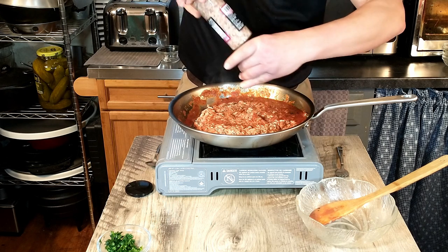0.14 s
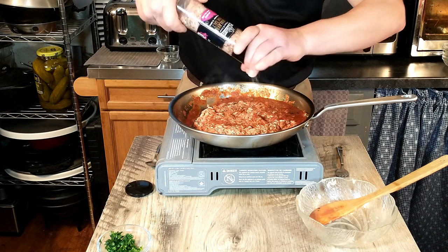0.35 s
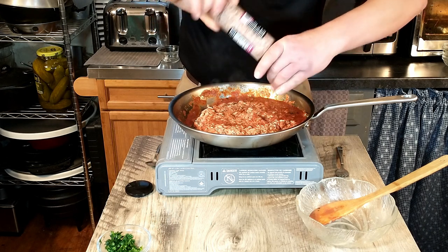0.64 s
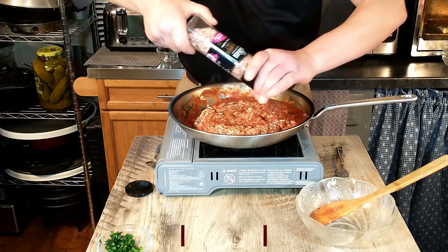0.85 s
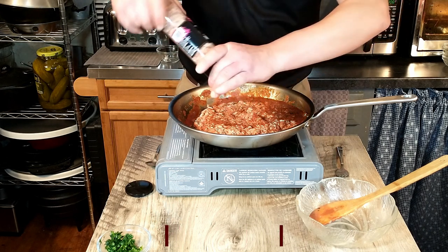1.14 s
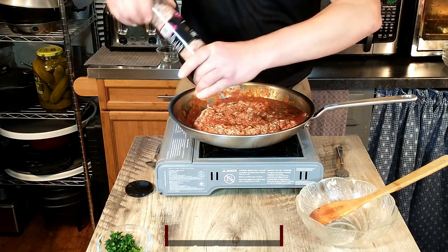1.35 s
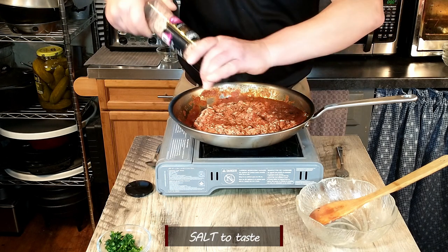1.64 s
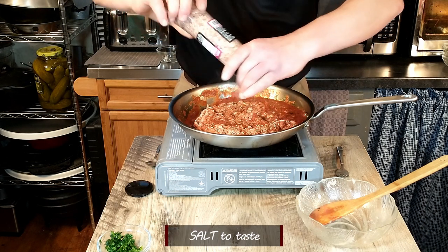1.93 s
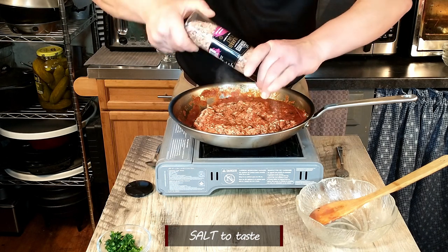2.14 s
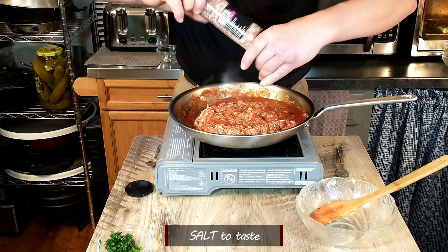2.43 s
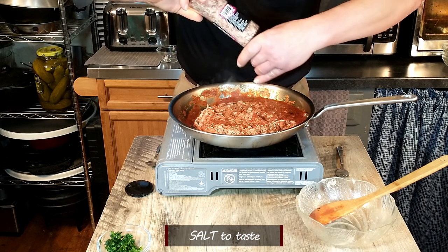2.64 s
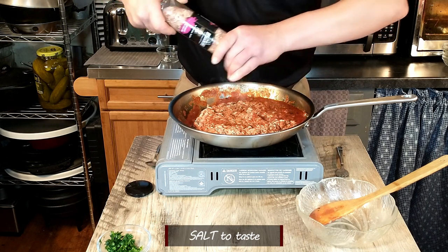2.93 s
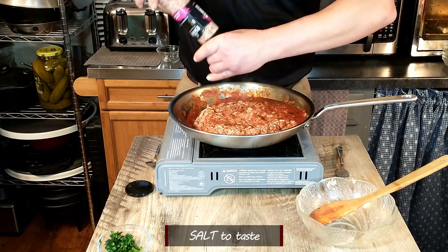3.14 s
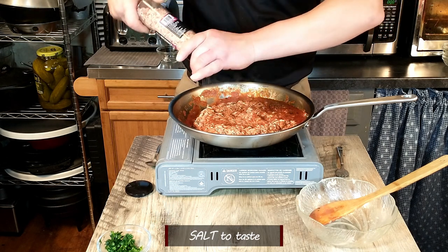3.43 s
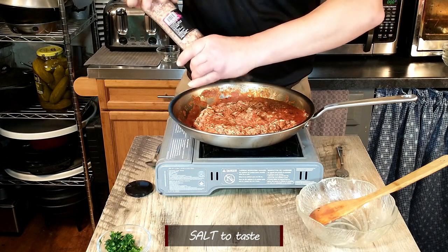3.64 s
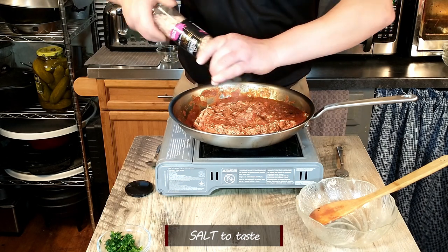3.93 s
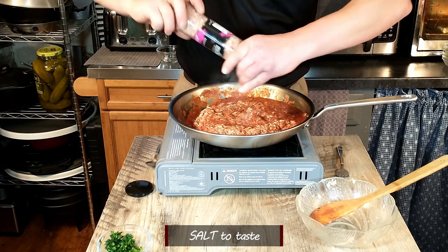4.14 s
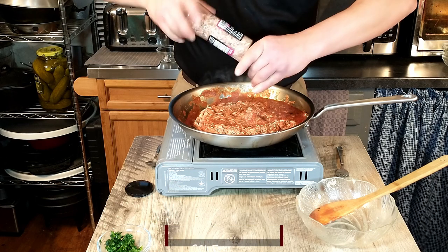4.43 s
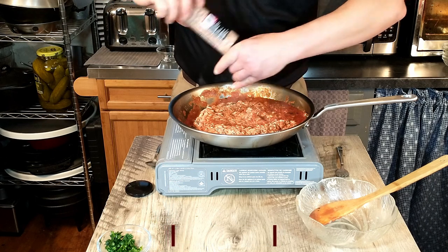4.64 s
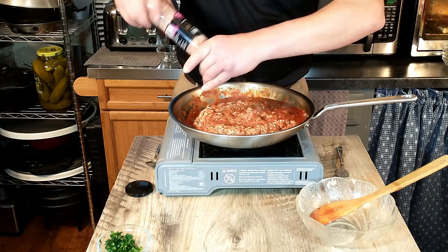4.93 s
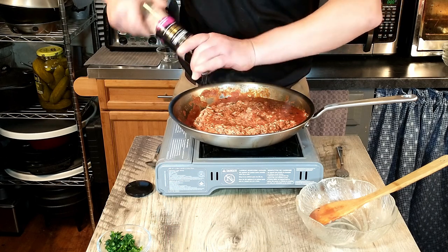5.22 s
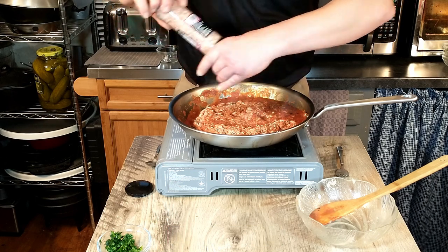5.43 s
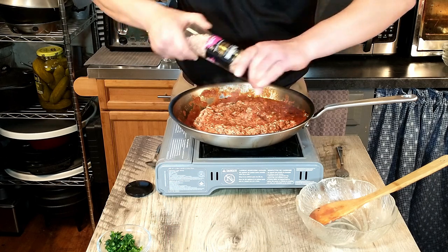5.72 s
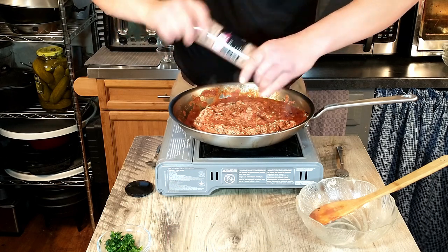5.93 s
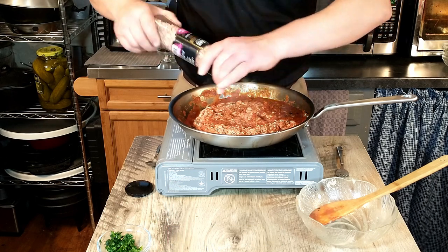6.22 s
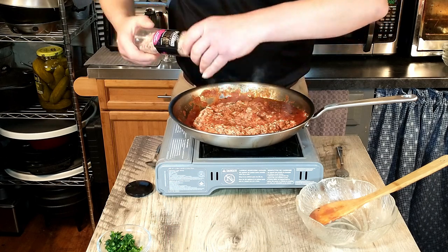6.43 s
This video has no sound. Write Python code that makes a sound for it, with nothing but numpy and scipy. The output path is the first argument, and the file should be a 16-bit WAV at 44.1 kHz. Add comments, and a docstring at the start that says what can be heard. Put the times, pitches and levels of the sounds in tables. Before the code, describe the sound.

A salt grinder is twisted by hand in a small kitchen, about two turns a second. Each forward twist cracks a few big crystals and crunches the chips, and a lighter rasp follows as the wrist swings back. Loose salt rattles brightly in the jar and the plastic cap creaks faintly now and then. Thick sauce simmers very softly underneath. The microphone sounds slightly dull.

```python
"""A small kitchen: a salt grinder is twisted by hand, about two turns a second, over a simmering pan.
Each forward twist cracks a few big crystals and crushes the chips, ringing the plastic housing.
The return twist is lighter. Loose salt rattles in the jar, and the cap creaks now and then.
The microphone is dull above 8 kHz and clips on the hardest cracks."""
import sys
import numpy as np
from scipy import signal
from scipy.fft import rfft, irfft
from scipy.io import wavfile
from scipy.ndimage import uniform_filter1d

SR = 44100
rng = np.random.default_rng(int(sys.argv[2]) if len(sys.argv) > 2 else 0)


def put_to_file(sound):
    """Save the sound as 16-bit audio at rate SR, in the file named by the first command-line argument."""
    columns = np.atleast_2d(sound).T  # one column per channel
    safe = np.clip(columns, -1, 1)
    whole_steps = np.round(safe * 32767)
    wavfile.write(sys.argv[1], SR, whole_steps.astype(np.int16))


N = 290574

# Spectra of sauce, loose salt, milled chips and big snaps. Each row: frequency in Hz, level in dB.
SIMMER_SPECTRUM = [(20, -10.5), (55, -19.5), (100, -8.5), (180, 0.5), (350, 1), (490, 7), (590, 11.5),
                   (720, 5), (900, 3), (1300, 3), (2200, -4), (7000, -8)]
RATTLE_SPECTRUM = [(100, -39.5), (400, -35.5), (1200, -13.5), (2500, -14.5), (3600, -4), (4600, -1),
                   (5600, 3), (7000, 4.5), (8000, -3)]
CRUNCH_SPECTRUM = [(40, -39.5), (120, -43), (280, -13.5), (550, -6.5), (900, -4.2), (1300, 1.3),
                   (2000, 2.5), (2900, -1.1), (4500, -1.2), (6300, -8.5), (8000, -16)]
SNAP_SPECTRUM = [(40, -46.5), (120, -35), (280, -16), (550, -9.5), (900, -5), (1400, 5.5), (2100, 4.8),
                 (3000, 5), (4500, 3.5), (6300, 0.5), (8000, -6)]
# Housing modes, and shell notes woken by hard jolts. Each row: frequency in Hz, level in dB, T60 in seconds.
HOUSING_MODES = [(184, -28, 0.12), (290, -21, 0.12), (730, -20, 0.07), (1038, -15, 0.022),
                 (1200, -12.5, .025), (1560, -26, 0.012), (1750, -20.5, 0.015), (2500, -21, 0.04),
                 (4530, -25, 0.017), (6200, -3.5, 0.021)]
SHELL_MODES = [(1165, -2, 0.0714), (1235.7, 0, .1), (1300, -.5, .1), (1425, 1, .09), (1551, 1.5, .09),
               (1690, -2, .09), (1870, -1, .08), (2030, 1, .08)]
# Cap rubbing its seat on release. Each row: start and length in seconds, pitch in Hz, level in dB.
CAP_RUBS = [(3.931, 0.08, 1690, -37.5), (4.032, 0.087, 1677, -47.5), (4.368, 0.067, 1750, -44),
            (4.901, 0.063, 1718, -39), (5.756, 0.075, 1667, -38), (6.154, 0.09, 1750, -35.5)]
# Salt stirring as the grinder is waved about. Each row: time in seconds, level in dB.
SALT_STIRRING = [(0, -40), (1.35, -31), (2.3, -36), (2.68, -45), (2.8, -38), (3.17, -48), (3.3, -36),
                 (3.64, -56), (3.75, -30), (4.05, -43), (4.9, -32), (5.4, -33), (6.36, -30), (6.5, -44)]
# Forward twists. Each row: start in seconds; crush length in seconds, level in dB, 20 dB fade in seconds;
# salt length in seconds, level in dB, swell in seconds, 20 dB fade in seconds.
FORWARD_TWISTS = [(0.297, 0.089, -16.4, 0.146, 0.12, -15.9, 0.043, 0.134),
                  (0.746, 0.079, -15.0, 0.076, 0.121, -15.5, 0.004, 0.042),
                  (1.174, 0.09, -17.1, 0.138, 0.095, -15.8, 0.004, 0.063),
                  (1.632, 0.097, -18.3, 0.08, 0.139, -14.6, 0.036, 0.04),
                  (2.075, 0.083, -18.7, 0.087, 0.138, -17.1, 0.029, 0.088),
                  (2.857, 0.085, -16.8, 0.168, 0.173, -18.8, 0.004, 0.065),
                  (3.332, 0.107, -15.3, 0.088, 0.131, -16.2, 0.026, 0.066),
                  (3.8, 0.081, -16.1, 0.144, 0.119, -15.5, 0.062, 0.04),
                  (4.252, 0.083, -16.8, 0.145, 0.113, -15.2, 0.004, 0.086),
                  (4.74, 0.095, -14.5, 0.152, 0.136, -18.4, 0.019, 0.116),
                  (5.194, 0.085, -16.6, 0.149, 0.145, -17.8, 0.044, 0.12),
                  (5.609, 0.086, -14.6, 0.165, 0.163, -15.6, 0.104, 0.04),
                  (6.014, 0.087, -17.3, 0.173, 0.14, -15.0, 0.124, 0.04)]
# Lighter twists as the wrist swings back. Each row: as for the forward twists.
RETURN_TWISTS = [(0.0, 0.009, -20.6, 0.06, 0.008, -15.4, 0.055, 0.05),
                 (0.085, 0.113, -21.1, 0.067, 0.211, -26.6, 0.046, 0.105),
                 (0.542, 0.062, -21.8, 0.072, 0.093, -21.2, 0.057, 0.13),
                 (0.971, 0.083, -24.5, 0.086, 0.2, -26.9, 0.032, 0.1),
                 (1.429, 0.067, -24.0, 0.133, 0.202, -28.0, 0.089, 0.099),
                 (1.858, 0.099, -25.0, 0.077, 0.175, -24.7, 0.011, 0.106),
                 (2.298, 0.029, -22.0, 0.056, 0.019, -27.1, 0.016, 0.08),
                 (2.398, 0.018, -19.7, 0.043, 0.014, -22.6, 0.004, 0.071),
                 (2.521, 0.011, -21.8, 0.125, 0.023, -24.8, 0.02, 0.096),
                 (2.799, 0.033, -21.2, 0.077, 0.064, -26.8, 0.004, 0.097),
                 (3.242, 0.036, -29.0, 0.061, 0.042, -17.2, 0.032, 0.081),
                 (3.743, 0.055, -35.0, 0.1, 0.021, -25.9, 0.004, 0.06),
                 (4.075, 0.033, -39.0, 0.102, 0.039, -27.3, 0.017, 0.104),
                 (4.129, 0.084, -38.2, 0.091, 0.084, -17.4, 0.015, 0.04),
                 (4.475, 0.026, -28.4, 0.078, 0.028, -35.0, 0.025, 0.093),
                 (4.564, 0.092, -31.7, 0.101, 0.081, -19.9, 0.008, 0.078),
                 (4.986, 0.086, -21.0, 0.095, 0.097, -24.3, 0.057, 0.136),
                 (5.403, 0.095, -21.2, 0.087, 0.135, -23.8, 0.046, 0.062),
                 (5.83, 0.082, -21.7, 0.06, 0.128, -26.5, 0.02, 0.098),
                 (6.239, 0.027, -20.9, 0.156, 0.054, -26.5, 0.027, 0.117),
                 (6.536, 0.05, -34.6, 0.1, 0.05, -25.8, 0.039, 0.1)]
# Big crystals cracking, cap knocking. Each row: start in seconds, force in dB, treble in dB, bass in dB,
# jolt pitch in Hz, shell ring in dB.
BIG_CRACKS = [(0.0976, -6.0, -2.0, 12.0, 1210.0, 0.0), (0.2901, -3.0, 2.0, -1.0, 1710.0, 0.0),
              (0.301, 3.0, -4.0, -6.5, 1410.0, 2.0), (0.3446, 8.0, -3.0, 1.0, 1435.0, 3.0),
              (0.3537, 3.5, -10.5, -5.5, 1425.0, 5.0), (0.751, 6.0, -5.0, 3.5, 1250.0, 2.0),
              (0.7596, 4.0, 7.5, 0.5, 1240.0, 0.0), (0.7735, 4.0, 0.5, 1.5, 1250.0, -3.0),
              (0.813, 11.0, 2.5, -3.5, 1540.0, -3.0), (0.9727, -9.0, -2.0, -0.5, 1470.0, 0.0),
              (1.011, -2.0, -2.5, 9.0, 2060.0, 0.0), (1.1761, -1.5, -12.5, 10.0, 1330.0, 0.0),
              (1.19, 5.0, -9.5, -2.5, 1400.0, -5.0), (1.2423, 9.5, 4.0, 0.5, 2050.0, 0.0),
              (1.246, 5.5, -2.0, 3.0, 1550.0, 0.0), (1.4425, -2.0, -1.5, 6.0, 1420.0, -8.0),
              (1.4944, -1.0, -8.5, 2.0, 1870.0, 0.0), (1.6359, -0.5, -0.5, 2.5, 1680.0, 0.0),
              (1.6669, 8.5, -1.5, -11.5, 1150.0, -8.0), (1.7187, 3.0, -1.5, -6.0, 1220.0, 0.0),
              (1.8612, -9.0, -2.0, 1.0, 1270.0, 0.0), (2.0863, -0.5, -2.5, -3.0, 1260.0, 4.0),
              (2.115, 6.0, 1.5, 5.0, 1950.0, -8.0), (2.1523, 6.5, -1.0, 7.0, 1620.0, 0.0),
              (2.1825, 6.0, 18.5, -2.0, 1920.0, 0.0), (2.3082, -11.5, 1.5, -0.5, 1660.0, 0.0),
              (2.4016, 6.0, -4.0, 7.0, 1290.0, 3.0), (2.4848, -8.0, 14.0, 0.5, 1280.0, 0.0),
              (2.5279, 7.0, 2.0, -5.5, 1660.0, -3.0), (2.5389, 3.0, -5.0, -3.5, 1660.0, 0.0),
              (2.8624, 6.5, -9.0, 0.0, 1180.0, 2.0), (2.8774, 3.5, -1.0, -4.5, 1220.0, 0.0),
              (2.9204, 2.0, -5.0, -4.5, 1540.0, 6.0), (2.9797, -1.0, 1.0, -1.0, 1230.0, 0.0),
              (3.1094, -7.5, -0.0, -1.0, 1220.0, 0.0), (3.22, -9.0, 15.5, -0.5, 1210.0, 0.0),
              (3.3392, 0.5, -2.0, 3.5, 1900.0, 0.0), (3.383, 2.0, -10.0, 8.0, 1510.0, 0.0),
              (3.831, 1.5, -6.5, -3.5, 1440.0, 0.0), (3.8833, 3.0, 16.0, -2.5, 1900.0, 0.0),
              (4.136, -5.5, 9.5, -3.5, 1720.0, 0.0), (4.2589, 3.5, -8.0, -5.0, 1990.0, 4.0),
              (4.2826, 4.5, -13.5, -9.0, 1540.0, 0.0), (4.3286, 7.0, -0.0, -4.0, 1950.0, 3.0),
              (4.5618, -9.5, 13.5, -0.5, 1150.0, 0.0), (4.6572, -0.5, -10.0, 15.0, 1240.0, 5.0),
              (4.7466, -4.0, -9.5, 13.0, 1590.0, 0.0), (4.7932, 5.5, -1.5, 0.0, 2020.0, 0.0),
              (4.8412, 4.5, 4.5, -1.5, 2060.0, 0.0), (4.8615, 3.5, 11.0, -0.5, 1220.0, 0.0),
              (4.9969, -0.5, -14.5, 7.5, 1660.0, 4.0), (5.1984, -4.5, -8.0, 6.0, 1140.0, 8.0),
              (5.2443, 3.5, -1.5, -5.0, 1220.0, 5.0), (5.2968, 1.5, 5.5, -3.5, 1980.0, -4.0),
              (5.442, 1.0, -14.0, 15.0, 1220.0, 2.0), (5.6149, 0.0, -4.0, 6.5, 1295.0, 10.0),
              (5.672, 3.5, 7.0, 1.5, 1240.0, 8.0), (5.8722, 1.0, 12.0, 16.0, 1330.0, 0.0),
              (5.933, -4.5, 5.0, -1.5, 1960.0, 0.0), (6.0047, -2.0, -4.0, 8.5, 1940.0, 0.0),
              (6.0197, 3.0, -10.5, 15.0, 1670.0, -3.0), (6.107, -0.5, 0.0, 3.0, 1650.0, -4.0),
              (6.2433, -6.0, -0.5, 15.0, 1450.0, 0.0), (6.2936, -4.5, -2.5, 14.0, 1290.0, -8.0)]
# Room decay. Each row: frequency in Hz, T60 in seconds.
ROOM_DECAY = [(200, 0.138), (1400, 0.236), (4000, 0.2097), (7500, 0.2357)]


def gain_of(db):
    """Decibels to amplitude."""
    return 10 ** (np.asarray(db) / 20)


def unit_rms(x):
    """Scales to RMS 1."""
    return x / np.sqrt(np.mean(x ** 2) + 1e-20)


def curve_at(points, hz):
    """Interpolates a table over log frequency."""
    point_hz, value = np.transpose(points)
    return np.interp(np.log(hz + 1), np.log(point_hz), value)


def add(mix, start_s, sound):
    """Mixes a sound in at start_s."""
    part = mix[max(round(start_s * SR), 0):][:len(sound)]
    part += sound[:len(part)]


def mic_lowpass(x, edge_hz=7900):
    """The microphone's steep treble limit."""
    return signal.oaconvolve(x, signal.firwin(121, edge_hz, window=("kaiser", 8), fs=SR), "same")


def cut_rumble(x, corner_hz):
    """High-pass that takes low rumble out of the grinder and its echoes."""
    return signal.sosfilt(signal.butter(3, corner_hz, "highpass", fs=SR, output="sos"), x)


def causal_click(spectrum_db):
    """Minimum-phase click with the given spectrum."""
    log_gain = np.log(gain_of(np.concatenate([spectrum_db, spectrum_db[-2:0:-1]])))
    return np.fft.ifft(np.exp(np.conj(signal.hilbert(log_gain)))).real


def grain(spectrum, ragged_db, smear_s, treble_db=0, bass_db=0, size=2048):
    """One click, coloured by the grain's chance shape; each frequency leaves by its own path."""
    hz = np.fft.rfftfreq(size, 1 / SR)
    noise = rng.standard_normal((2, len(hz)))
    shape, path = unit_rms(uniform_filter1d(uniform_filter1d(noise, 50), 30))
    tilt_db = curve_at([(70, 0), (260, bass_db), (520, bass_db), (1100, 0),
                        (2200, 0.0042), (5000, treble_db)], hz)
    click = causal_click(curve_at(spectrum, hz) + ragged_db * shape + tilt_db)
    delay_s = smear_s * (1 + np.tanh(path)) / 2
    click = irfft(rfft(click) * np.exp(-2j * np.pi * np.cumsum(delay_s) * hz[1]))
    return click / np.linalg.norm(mic_lowpass(click))


def grain_stream(spectrum, per_s, spread_db, ragged_db, steady_s, smear_s=0.0007075, kinds=32):
    """Randomly timed clicks of even mean power."""
    hits = gain_of(spread_db * np.minimum(rng.exponential(1, N), 4))
    hits *= rng.random(N) < per_s / SR
    window = int(steady_s * SR)
    power = uniform_filter1d(uniform_filter1d(hits ** 2, window), window)
    hits *= rng.choice([-1, 1], N) / np.sqrt(abs(power) + 1e-6)
    kind = rng.integers(0, kinds, N)
    return sum(signal.oaconvolve(hits * (kind == k), grain(spectrum, ragged_db, smear_s))[:N]
               for k in range(kinds))


def stove(mains_hz=60):
    """Thick sauce simmers softly over a faint mains hum."""
    hum = np.sqrt(2) * np.sin(2 * np.pi * mains_hz * np.arange(N) / SR)
    simmer = grain_stream(SIMMER_SPECTRUM, per_s=700, spread_db=0, ragged_db=2, steady_s=0.18, kinds=24)
    return gain_of(-64.5) * hum + gain_of(-41) * simmer


def room_response(wet_db, early_db, echoes_per_s=4000, size=16000):
    """Echoes from pan, counter and cupboards, then a short tail that dies band by band."""
    onset = np.clip((np.arange(size) / SR - .002) / 0.00227, 0, 1)
    taps = rng.choice([-1, 1], size) * (rng.random(size) < echoes_per_s / SR) * onset
    hz, frame_s, bands = signal.stft(taps, SR, nperseg=256)
    decay = gain_of(-60 * frame_s / curve_at(ROOM_DECAY, hz)[:, None])
    tail = signal.istft(bands * decay, SR, nperseg=256)[1][:size]
    response = gain_of(wet_db) * tail / np.linalg.norm(tail)
    for echo_s in (.0057, .0083, .0165):
        add(response, echo_s * rng.uniform(0.81, 1.1), gain_of([early_db]))
    return response


def kitchen(x, wet_db, early_db, patterns=7, crossfade_s=.007):
    """Fractures round the burr radiate different ways, so successive ones raise different echoes."""
    position = np.arange(N) / SR / crossfade_s
    out = x.copy()
    for k in range(patterns):
        distance = np.minimum(abs((position - k + 1) % patterns - 1), 1)
        out += signal.oaconvolve(x * np.cos(np.pi / 2 * distance), room_response(wet_db, early_db))[:N]
    return out


def cap_rubbing(width_hz=170):
    """Plastic slips on plastic: a brief, hoarse, narrow-band creak."""
    out = np.zeros(N)
    for start_s, length_s, hz, db in CAP_RUBS:
        slips = rng.standard_normal(int(length_s * SR))
        pole = np.exp((-np.pi * width_hz + 2j * np.pi * hz) / SR)
        creak = signal.lfilter([1], np.poly([pole, pole]), slips).real
        add(out, start_s, gain_of(db) * unit_rms(creak) * signal.windows.tukey(len(slips), .5))
    return out


def housing(x, ring_db, size=6000):
    """Direct sound plus the plastic housing's short modes."""
    t = np.arange(size) / SR
    ring = sum(gain_of(db - 60 * t / t60_s) * np.cos(2 * np.pi * hz * t)
               for hz, db, t60_s in HOUSING_MODES)
    return x + gain_of(ring_db) * signal.oaconvolve(x, ring)[:N]


def twisting(creep_db=-12, creep_db_per_s=350, bite_s=0.00575, sag_db_per_s=26, salt_start_db=-8):
    """Crush and salt gains: the burr creeps, bites, then meets less resistance as it frees the salt."""
    time_s = np.arange(0, N, 16) / SR
    crush_power = np.zeros(len(time_s))
    salt_power = gain_of(np.interp(time_s, *np.transpose(SALT_STIRRING))) ** 2
    for twist in FORWARD_TWISTS + RETURN_TWISTS:
        start_s, crush_s, crush_db, crush_fade_s, salt_s, salt_db, swell_s, salt_fade_s = twist
        t = time_s - start_s
        bite_db = creep_db * np.clip(1 - t / bite_s, 0, 1) + creep_db_per_s * np.minimum(t, 0)
        sag_db = sag_db_per_s * np.clip(t, 0, crush_s)
        swell_db = salt_start_db * np.clip(1 - t / swell_s, 0, 1)
        crush_fade_db = 20 * np.maximum(t - crush_s, 0) / crush_fade_s
        salt_fade_db = 20 * np.maximum(t - salt_s, 0) / salt_fade_s
        crush_power += gain_of(crush_db + bite_db - sag_db - crush_fade_db) ** 2
        salt_power += gain_of(salt_db + bite_db + swell_db - salt_fade_db) ** 2
    return [np.interp(np.arange(N) / SR, time_s, np.sqrt(power)) for power in (crush_power, salt_power)]


def salt_sliding(flow):
    """Loose crystals tumble against each other and the jar: dense bright ticks."""
    ticks = grain_stream(RATTLE_SPECTRUM, per_s=1200, spread_db=2.7, ragged_db=6, steady_s=0.037)
    return gain_of(-2.9) * flow * ticks


def crushing(effort):
    """Chips are milled between the burr's teeth: many small fractures, a few large."""
    fractures = grain_stream(CRUNCH_SPECTRUM, per_s=440, spread_db=3.1, ragged_db=6, steady_s=0.0212)
    return gain_of(-3.4) * effort * fractures


def cracking(splinters=5, splinter_db=-12, splinter_s=.004, shell_db=-32, detune_db_per_octave=85,
             smear_s=0.0014996, size=6000):
    """A big crystal snaps, its splinters give way, and the jolt rings the shell's nearest notes."""
    out, t = np.zeros(N), np.arange(size) / SR
    for start_s, force_db, treble_db, bass_db, jolt_hz, ring_db in BIG_CRACKS:
        snap = grain(SNAP_SPECTRUM, 1.5, smear_s, treble_db, bass_db)
        add(out, start_s, gain_of(force_db) * snap)
        for delay_s, sign in zip(rng.exponential(splinter_s, splinters), rng.choice([-1, 1], splinters)):
            splinter = grain(SNAP_SPECTRUM, 3.7, smear_s, treble_db, bass_db)
            add(out, start_s + delay_s, sign * gain_of(force_db + splinter_db) * splinter)
        jolt_db = force_db + shell_db + ring_db - max(treble_db, 0)  # bright snaps barely move the shell
        for hz, mode_db, t60_s in SHELL_MODES:
            note_db = jolt_db + mode_db - detune_db_per_octave * abs(np.log2(hz / jolt_hz))
            add(out, start_s, gain_of(note_db - 60 * t / t60_s) * np.cos(2 * np.pi * hz * t))
    return gain_of(6) * out


def scene():
    """Grinder and stove in the kitchen, mono."""
    effort, flow = twisting()
    grinder = housing(crushing(effort) + cracking(), ring_db=-31) + salt_sliding(flow) + cap_rubbing()
    in_room = kitchen(grinder, wet_db=-1, early_db=-17)
    return (cut_rumble(in_room, corner_hz=145) + stove())[None]


def record(dry, edge_hz=16000):
    """Narrow-band microphone, clipping at full scale, then a band limit."""
    clipped = np.clip(mic_lowpass(dry[0]), -1, 1)
    band_limit = signal.firwin(511, edge_hz, window=("kaiser", 9), fs=SR)
    return signal.oaconvolve(clipped, band_limit, "same")[None]


dry = scene()
out = record(dry)
put_to_file(out)
```